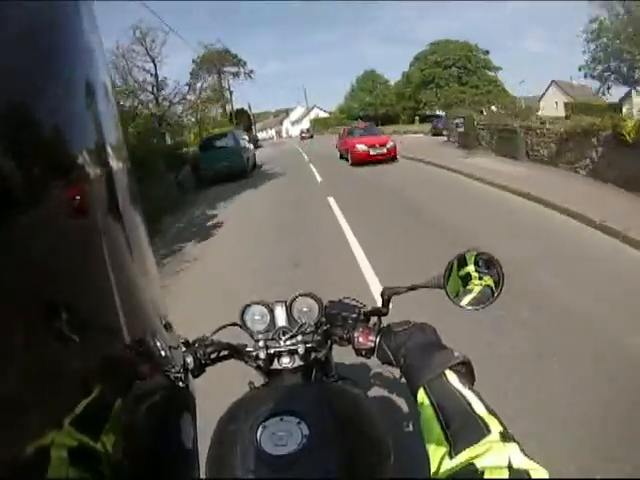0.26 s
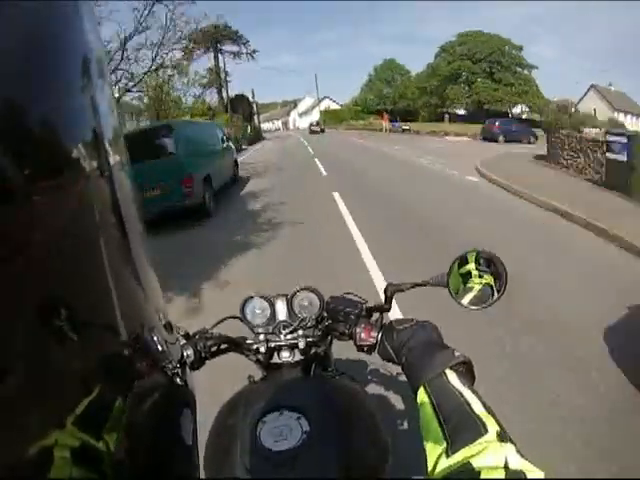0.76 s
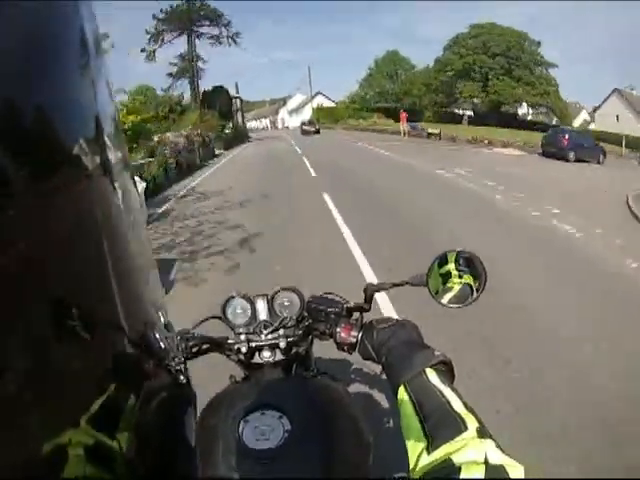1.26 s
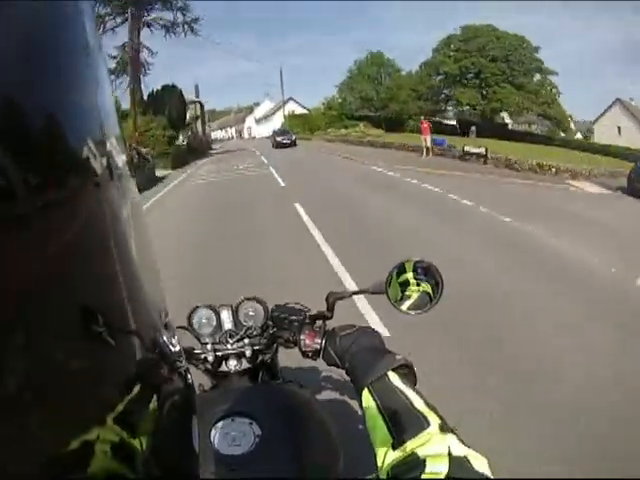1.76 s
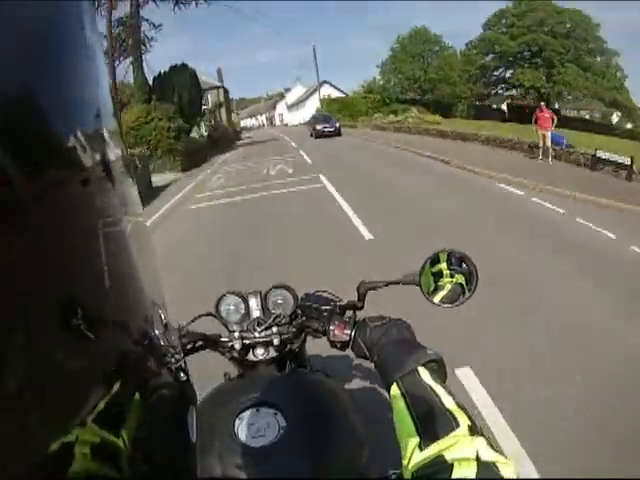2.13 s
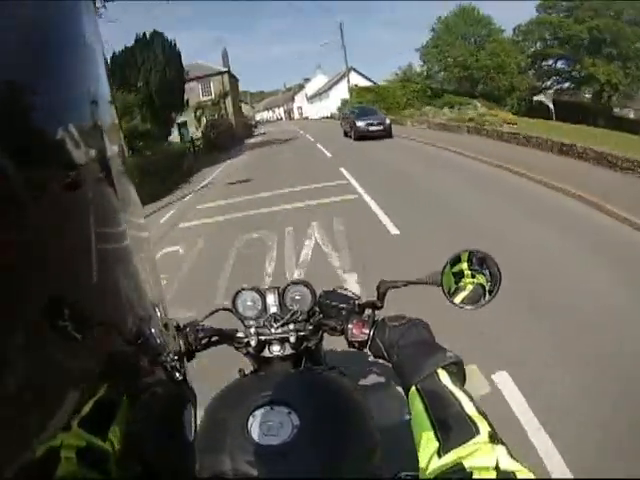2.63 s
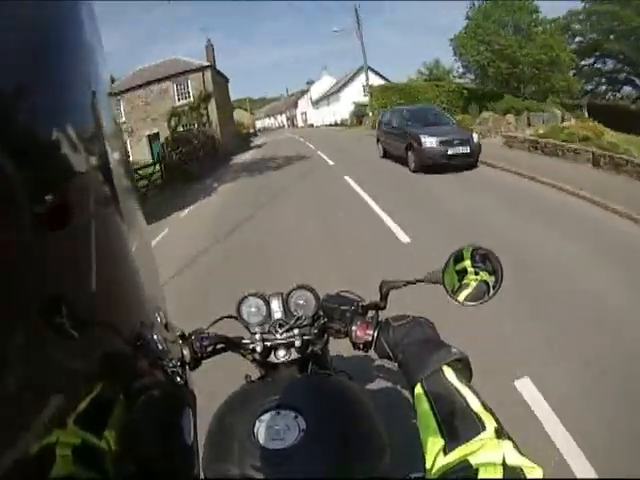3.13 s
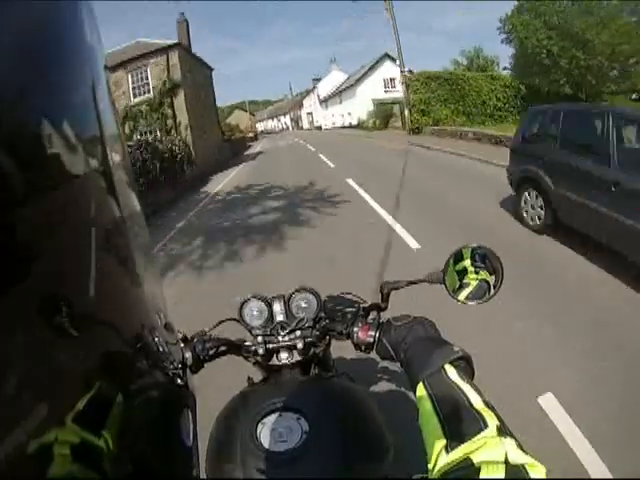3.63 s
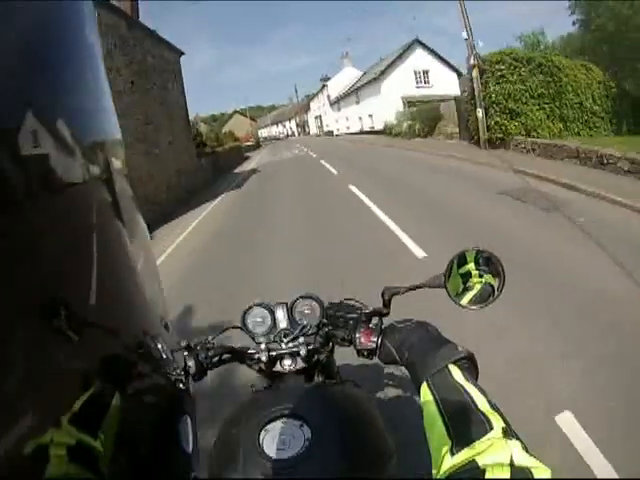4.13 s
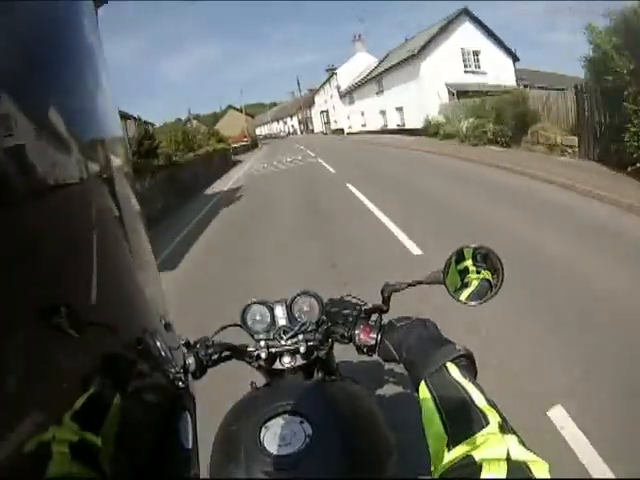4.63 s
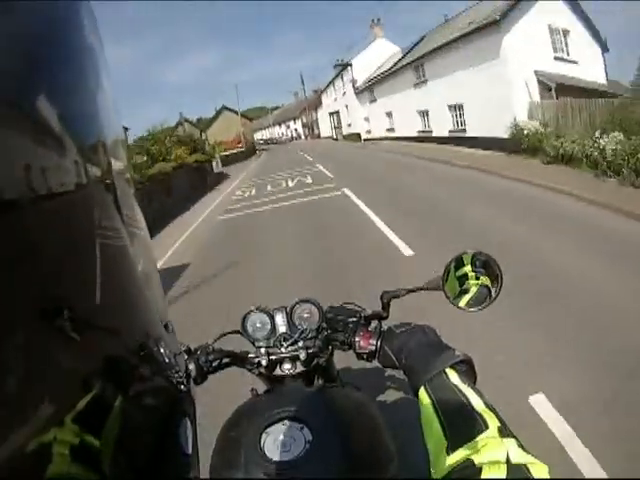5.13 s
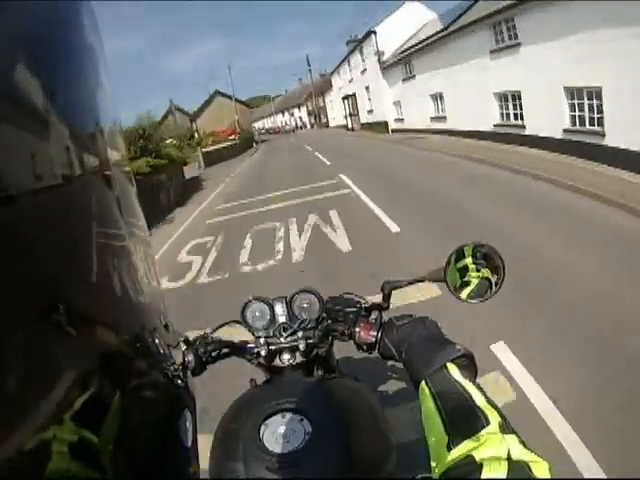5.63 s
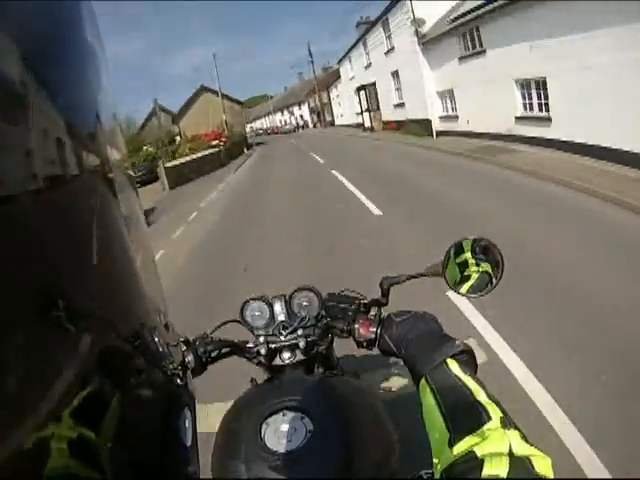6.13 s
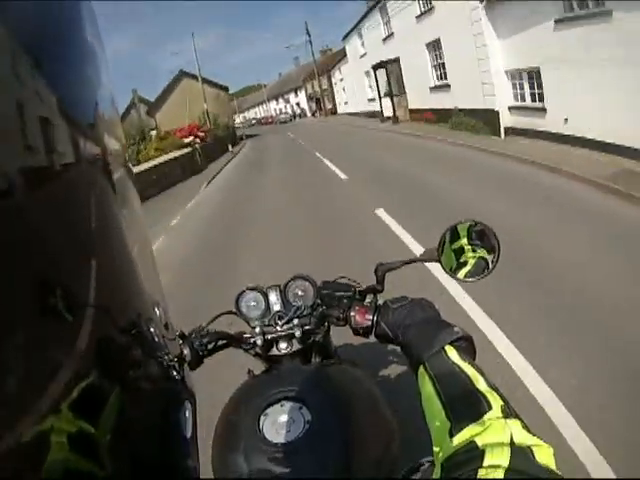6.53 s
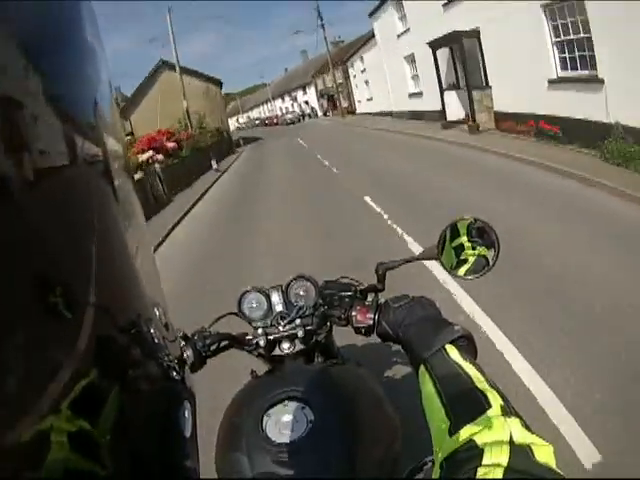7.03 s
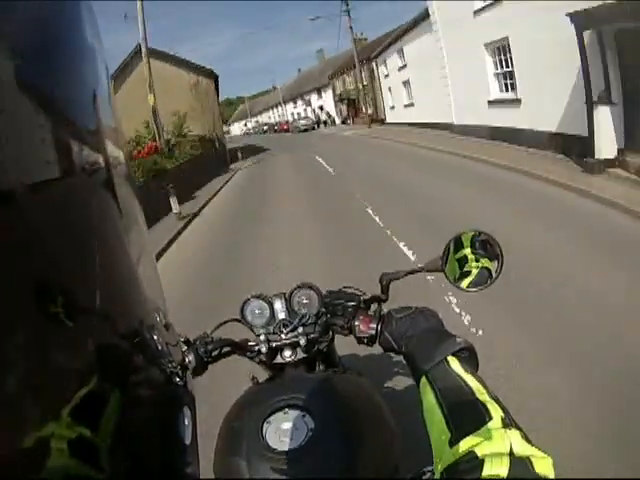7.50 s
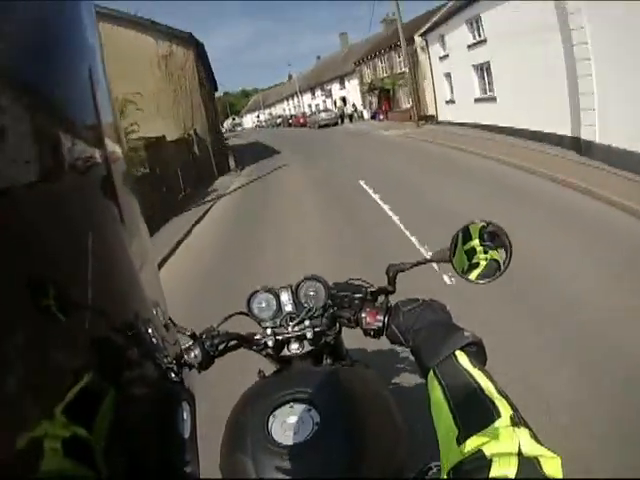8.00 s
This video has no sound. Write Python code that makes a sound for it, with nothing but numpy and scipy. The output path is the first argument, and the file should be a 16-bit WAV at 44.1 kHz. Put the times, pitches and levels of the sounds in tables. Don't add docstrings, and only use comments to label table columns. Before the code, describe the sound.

Continuous rushing air dominates a motorcycle ride: hollow low rumble, plastic-sounding midrange roar and thin hiss with faint whistling colour. Irregular low thumps come from the shaking camera mount. Small taps scatter through the first half, one noticeably harder, then a short hollow double knock from a road bump. The roar grows gentler toward the end, while a weak low engine drone wavers beneath. Enclosed, close mono perspective, outdoors on a road.

```python
import sys
import numpy as np
from scipy import signal
from scipy.fft import rfft, irfft, next_fast_len
from scipy.io import wavfile
from scipy.ndimage import uniform_filter1d, map_coordinates

SR = 44100
rng = np.random.default_rng(int(sys.argv[2]) if len(sys.argv) > 2 else 0)


def voltage_ratio(level):
    return 10 ** (np.asarray(level, float) / 20)


def unload_audio(sound):
    columns = np.transpose(np.atleast_2d(sound))
    steps = np.round(np.clip(columns, -1, 1) * 32767)
    wavfile.write(sys.argv[1], SR, steps.astype(np.int16))


N = 364266


def curves(rows):
    times, *columns = np.transpose(rows)
    return [np.interp(np.arange(N) / SR, times, column) for column in columns]


def unit(x):
    return x / np.sqrt(np.mean(x ** 2) + 1e-20)


def wobble(rate):
    knots = rng.standard_normal(int(N * rate / SR) + 4)
    return map_coordinates(knots, [np.arange(N) * rate / SR])


def spells(starts, lengths, sizes, rise, fall):
    t = np.arange(0, N, 100) / SR
    since = t - starts[:, None]
    rising = 1 + np.tanh(since / rise)
    falling = 1 - np.tanh((since - lengths[:, None]) / fall)
    return np.interp(np.arange(N) / SR, t, sizes @ (rising * falling / 4))


def rush(spectrum, patchy_db, peaks=()):
    z = signal.stft(rng.standard_normal(N), nperseg=512)[2]
    patches = uniform_filter1d(rng.standard_normal(z.shape), size=6, axis=0)
    patches = uniform_filter1d(patches, size=8, axis=1)
    noise = signal.istft(z * voltage_ratio(patchy_db * unit(patches)), nperseg=512)[1][:N]
    m = next_fast_len(N + 8192)
    hz = np.fft.rfftfreq(m, 1 / SR)
    f, db = np.transpose(spectrum)
    gain_db = np.interp(np.log(hz + 1), np.log(f + 1), db)
    for centre, width, lift_db in peaks:
        gain_db = gain_db + lift_db / (1 + (2 * (hz - centre) / width) ** 2)
    return unit(irfft(rfft(noise, m) * voltage_ratio(gain_db), m)[:N])


def add_ring(out, s, db, hz, t60, attack):
    start = int(s * SR)
    t = np.maximum(np.arange(start, start + SR // 4) / SR - s, 0)
    soft_start = 1 - np.exp(-(t / attack) ** 2)
    out[start:][:len(t)] += voltage_ratio(db - 60 * t / t60) * np.sin(2 * np.pi * hz * t) * soft_start


# (frequency [Hz], level [dB per Hz])
MIC_NOISE = [(6000, -40), (9000, -5), (12000, -4), (13200, -1), (14000, -2.5), (15300, -5.5), (17000, -40)]


def microphone_hiss():
    return voltage_ratio(-75.5) * rush(MIC_NOISE, patchy_db=0.9)


# (time [s], full-cycle rate [Hz], level of the fourth multiple [dB])
ENGINE_SPEED = [(0, 24.5, -46.5), (.9, 24.77, -58.5), (1.3, 24.85, -46), (2.2, 24.9, -48.5),
                (3.2, 25.27, -48.5), (3.9, 24.38, -63), (4.4, 24.3, -52.5), (4.9, 24.17, -47),
                (5.5, 24.3, -59), (6.2, 25.26, -49.5), (6.6, 25.55, -49.5), (7.4, 25.52, -51.5),
                (8.26, 25.62, -48.5)]
# (multiple of the cycle rate [-], level [dB])
ENGINE_TONES = [(2, -12), (3, -12), (4, -2.5), (5, -7), (6, -14), (7, -11), (9, -18), (11, -9.5),
                (15, -10.5)]


def engine():
    hz, db = curves(ENGINE_SPEED)
    turns = np.cumsum(hz) / SR
    hum = np.zeros(N)
    for multiple, level in ENGINE_TONES:
        loudness = voltage_ratio(level + 3.7 * wobble(9))
        hum += loudness * np.sin(2 * np.pi * (multiple * turns + 0.17 * wobble(10)))
    return voltage_ratio(db + 2.0) * hum


# (frequency [Hz], level [dB], time to fade by 60 dB [s])
CASE_TONES = [(102.7, -8.5, 0.079), (149.3, -2.5, 0.051), (205, -8, 0.079), (275, 4, 0.054),
              (386, -13, 0.064), (526, -2, 0.046), (962, -9.5, 0.1), (1296, -0.5, 0.05), (1420, -9.5, 0.06),
              (1800, -3, 0.029), (2140, -1, 0.025), (2350, -21, 0.022)]
# (time [s], level [dB], treble tilt [dB])
BUMP_CONTACTS = [
    (5.604, -23.5, 4),
    (5.6102, -22, -9),
]


def bump():
    out = np.zeros(N)
    for contact, (s, db, treble_db) in enumerate(BUMP_CONTACTS):
        direction = (-1) ** contact
        for hz, level, t60 in CASE_TONES:
            tilt_db = treble_db * np.log2(hz / 300) / 2
            add_ring(out, s, db + level + tilt_db, direction * hz, t60, attack=0.001)
    return out


# (time [s], peak level [dB], pitch [Hz])
CASE_FLICKS = [
    (1.1363, -25, 2050),
    (1.717, -27, 2297),
    (1.928, -24, 1577),
    (2.2737, -28, 2010),
    (2.9148, -22, 2227),
    (3.2989, -25, 2074),
    (3.4165, -22, 1700),
    (3.4181, -18, 2140),
    (3.4195, -23, 2540),
    (4.2353, -28, 1950),
]


def flicks():
    out = np.zeros(N)
    for s, db, hz in CASE_FLICKS:
        add_ring(out, s - 0.003, db + 0.5, hz, t60=0.029, attack=0.0033)
    return out


# (time [s], peak level [dB], pitch [Hz])
GRIT_TICKS = [
    (2.0058, -37, 11400),
    (2.0061, -41, 12300),
    (2.0067, -43, 13400),
    (3.4176, -46, 8500),
    (3.4178, -42, 7200),
    (3.4183, -30, 5900),
    (3.4186, -34, 4200),
    (3.419, -30, 3200),
]


def grit():
    out = np.zeros(N)
    for s, db, hz in GRIT_TICKS:
        add_ring(out, s, db + 3, hz, t60=0.006, attack=0.001)
    return out


# (time [s], strength [dB])
AIR_STRENGTH = [(0.0, -31), (0.6, -31.5), (1.3, -34), (2.2, -34.5), (3.2, -34.5), (4.2, -36.5), (5.0, -38),
                (5.6, -39.5), (6.2, -39.5), (7.0, -39.5), (7.6, -40.5), (8.26, -40.5)]


def airflow():
    db, = curves(AIR_STRENGTH)
    return db - db.mean()


# (start [s], length [s], level [dB], pitch [Hz])
MOUNT_SWINGS = [(0.023, 0.1, -31.5, 37.8), (0.306, 0.03, -32, 40.85), (0.407, 0.26, -36, 41.2),
                (0.563, 0.074, -40, 40.27), (0.874, 0.03, -35, 38.96), (0.95, 0.095, -31.5, 43.36),
                (1.332, 0.07, -31.5, 38.54), (1.723, 0.5, -35, 41.34), (2.396, 0.11, -34.5, 41.4),
                (2.615, 0.03, -31, 42.5), (2.701, 0.079, -33.5, 41.1), (2.942, 0.11, -43, 43.1),
                (3.14, 0.029, -30.7, 39.9), (3.29, 0.04, -33, 41.2), (3.454, 0.04, -29.5, 38.9),
                (3.55, 0.045, -32.6, 40), (3.72, 0.34, -39.5, 40.67), (4.15, 0.05, -39, 41.9),
                (4.683, 0.03, -35, 42.2), (5.031, 0.048, -37, 40.4), (5.188, 0.09, -42, 38.3),
                (5.61, 0.03, -41, 42.3), (6.389, 0.1, -43, 40.2), (6.54, 0.083, -36.5, 37.05),
                (6.8, 0.061, -36, 38.2), (6.92, 0.26, -43.5, 41.34), (7.18, 0.089, -36, 39.13),
                (7.35, 0.026, -37, 38.1), (7.432, 0.19, -39.5, 40.37), (7.952, 0.21, -47, 34.4)]
# (frequency [Hz], level [dB per Hz])
BUFFETING = [(8, -42), (14, -28), (25, -1.5), (34, -7.5), (48, -4), (57, -7.5), (66, -20), (90, -13),
             (130, -69.5)]


def sway():
    start, length, db, pitch = np.transpose(MOUNT_SWINGS)
    middles = sorted(zip(start + length / 2, pitch))
    hz = np.interp(np.arange(N) / SR, *np.transpose(middles))
    tremble = voltage_ratio(-42.5 + 0.6 * airflow() + 2.5 * wobble(24))
    throws = spells(start, length, voltage_ratio(db), rise=0.024, fall=0.02)
    size = tremble + voltage_ratio(2.2 * wobble(24)) * throws
    swing = np.sqrt(2) * np.sin(2 * np.pi * np.cumsum(hz + 1.42 * wobble(12)) / SR)
    buffet = uniform_filter1d(size, size=5000) * rush(BUFFETING, patchy_db=-2.0)
    return voltage_ratio(0.3) * size * swing + voltage_ratio(-7) * buffet


# (frequency [Hz], level [dB per Hz])
RUMBLE_COLOUR = [(40, -36), (62, -1), (78, -4), (97, -2.5), (124, -3), (216, -2.5), (300, -5), (344, -6.5),
                 (566, -7.5), (655, -12), (900, -14.5), (1170, -24.5), (1900, -82)]
# (frequency [Hz], width [Hz], lift [dB])
WALL_HUMS = [(274.4, 30, 5.5), (536, 33, 0)]


def rumble(flow, gust, eddy):
    level_db = -42.5 + 0.73 * flow + 0.32 * gust + 0.33 * eddy + 0.49 * wobble(30)
    return voltage_ratio(level_db) * rush(RUMBLE_COLOUR, patchy_db=0.8, peaks=WALL_HUMS)


# (frequency [Hz], level [dB per Hz])
ROAR_COLOUR = [(440, -33), (750, -12.5), (928, -4.5), (1060, -8), (1190, 0.5), (1440, -1), (1690, -4),
               (2100, -2.5), (2420, -4), (2810, -12), (3060, -13.5), (3280, -20), (3500, -18),
               (4550, -29.5), (7700, -120)]


def roar(flow, gust, eddy, fine):
    level_db = -40 + 0.91 * flow + 0.6 * gust + 0.39 * eddy + 0.21 * fine + 0.18 * wobble(150)
    return voltage_ratio(level_db) * rush(ROAR_COLOUR, patchy_db=0.19)


# (frequency [Hz], level [dB per Hz])
HISS_COLOUR = [(2600, -120), (3000, 5.5), (3600, -4), (4300, -3), (5600, -5), (7200, -8.5), (9000, -17.5),
               (9800, -120)]
# (frequency [Hz], width [Hz], lift [dB])
WHISTLES = [(3914, 170, 7.5), (4590, 90, 7.5), (5023, 340, 10.5), (5400, 200, 1), (6470, 460, 9.5),
            (8220, 690, 5.5)]


def edge_hiss(flow, gust, eddy, fine):
    level_db = -54 + 1.09 * flow + 1.2 * gust + 0.11 * eddy + 0.74 * fine
    return voltage_ratio(level_db) * rush(HISS_COLOUR, patchy_db=0.9, peaks=WHISTLES)


# (frequency [Hz], level [dB per Hz])
AIR_COLOUR = [(7500, -60), (8800, -5), (9600, -5.5), (11100, -7), (12300, -11), (13500, -22), (15300, -25),
              (17000, -60)]


def top_air(flow, gust, eddy, fine):
    level_db = -74 + 1.36 * flow + 1.1 * gust + 0.25 * eddy + 0.65 * fine
    return voltage_ratio(level_db) * rush(AIR_COLOUR, patchy_db=1.0)


# (start [s], length [s], swell [dB])
WIND_GUSTS = [(-0.18, 0.3, 2.5), (0.203, 0.25, 2.1), (0.493, 0.16, 3), (0.74, 0.08, -1), (0.859, 0.19, 3),
              (1.32, 0.057, 2), (1.412, 0.08, -1), (2.134, 0.059, -2.5), (2.249, 0.064, 0.8),
              (2.522, 0.07, -1), (2.659, 0.05, 5), (2.87, 0.085, 2.26), (3.18, 0.22, 1.4), (3.413, 0.12, 4),
              (3.67, 0.091, 1), (3.808, 0.33, 2.5), (4.24, 0.11, 2), (4.345, 0.15, 2.5), (4.539, 0.19, 2.2),
              (4.799, 0.31, 1.9), (5.09, 0.1, 2.5), (5.32, 0.07, 1), (5.876, 0.074, -1.5),
              (7.032, 0.054, 2), (7.597, 0.073, 2.45), (7.79, 0.14, 1.5), (7.97, 0.06, -2)]


def wind():
    flow = airflow()
    gust = spells(*np.transpose(WIND_GUSTS), rise=0.016, fall=0.04)
    eddy, fine = wobble(18), wobble(60)
    low = rumble(flow, gust, eddy) + roar(flow, gust, eddy, fine)
    high = edge_hiss(flow, gust, eddy, fine) + top_air(flow, gust, eddy, fine)
    return low + high


def scene():
    mix = microphone_hiss() + engine() + bump() + flicks() + grit() + sway() + wind()
    return mix[None]


def roll_off(x):
    return signal.sosfilt(signal.butter(12, 15240, fs=SR, output="sos"), x)


def record(dry):
    return roll_off(dry)


dry = scene()
out = record(dry)
unload_audio(out)
```